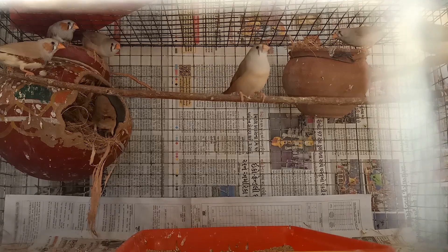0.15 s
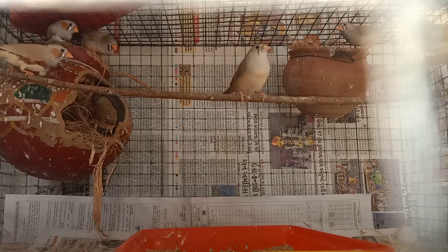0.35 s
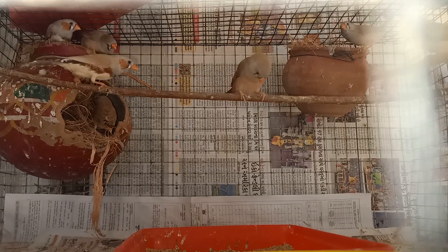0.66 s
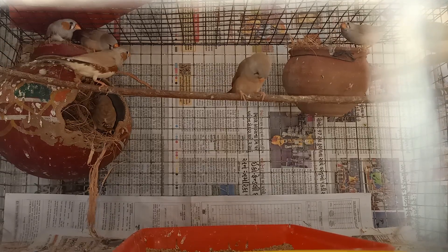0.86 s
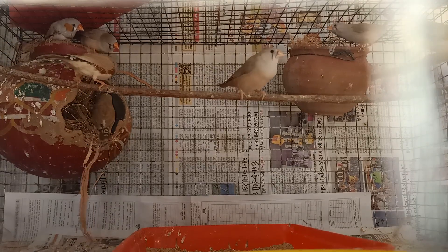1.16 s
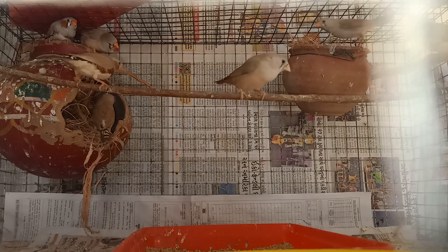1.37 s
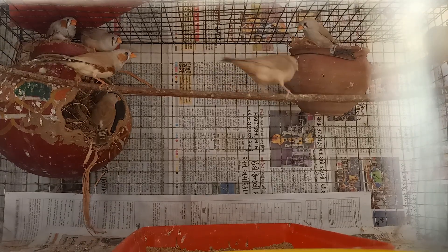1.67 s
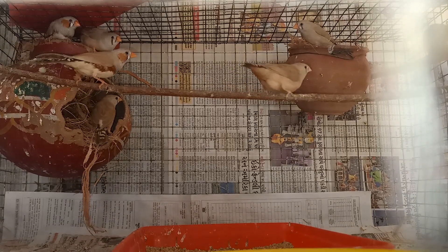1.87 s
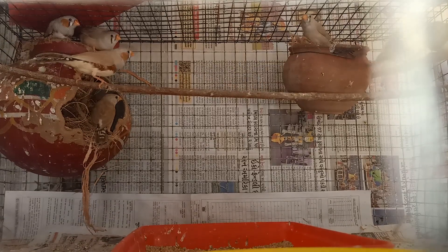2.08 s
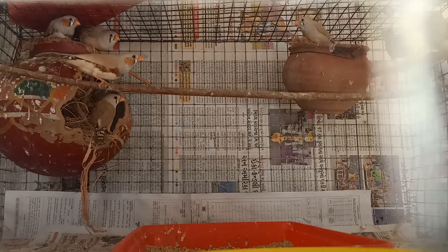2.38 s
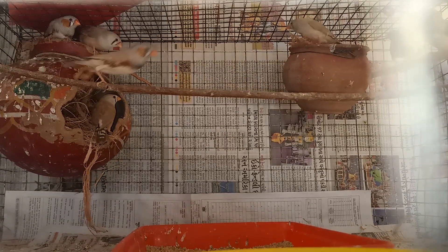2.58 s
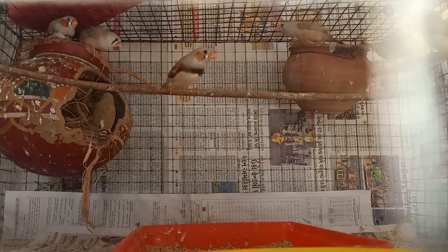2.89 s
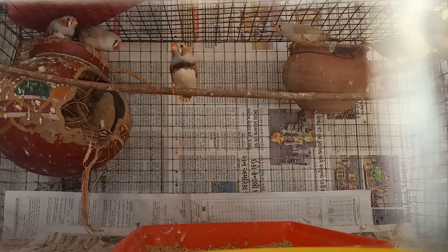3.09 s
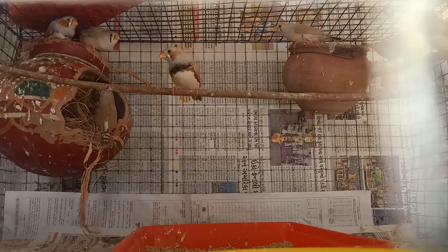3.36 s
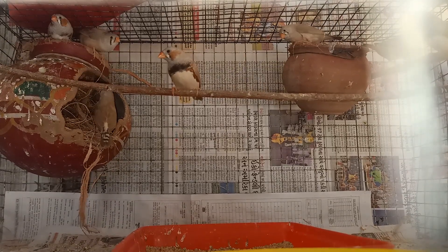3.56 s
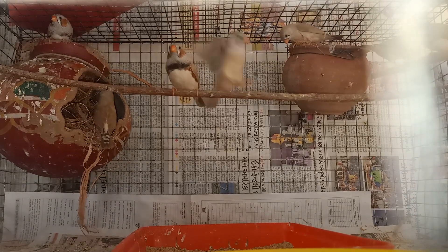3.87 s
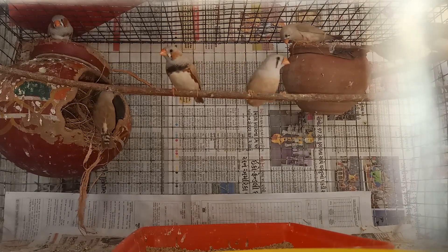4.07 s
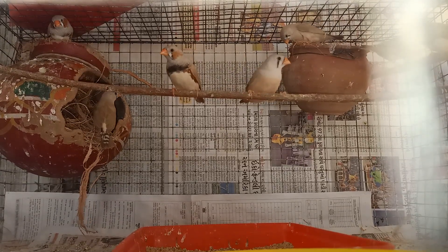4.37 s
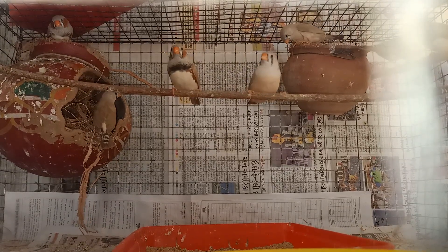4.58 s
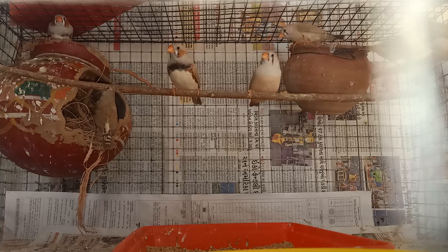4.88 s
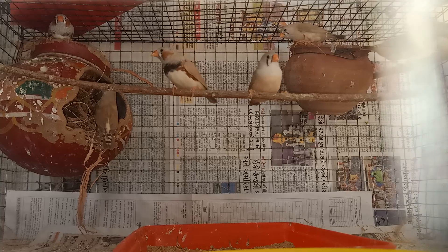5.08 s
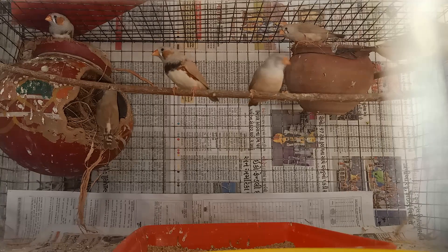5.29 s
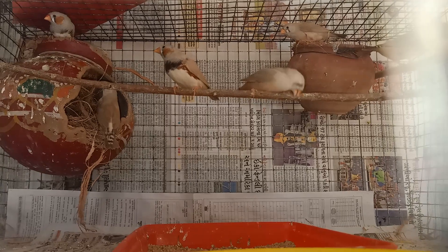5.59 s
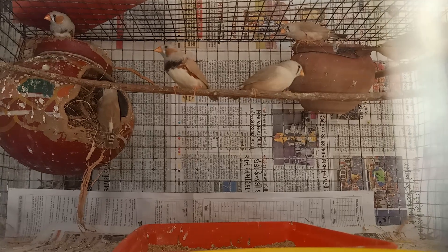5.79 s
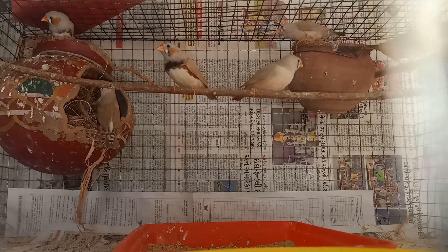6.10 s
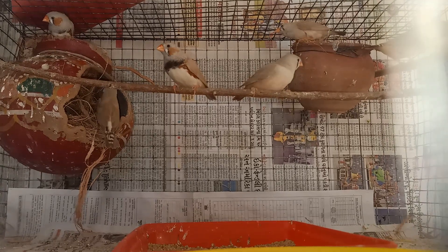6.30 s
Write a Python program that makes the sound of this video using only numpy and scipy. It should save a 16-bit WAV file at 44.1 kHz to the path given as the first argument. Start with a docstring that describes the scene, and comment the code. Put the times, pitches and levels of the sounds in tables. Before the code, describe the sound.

Caged finches indoors, heard in stereo with a long bright room ring. Quick scratchy chirps and nasal calls come first, then harsh rasps and sliding whistles crowd together at the busiest moment. After shorter scattered bursts the flock falls quiet, leaving soft distant twitter, claw ticks and light knocks on the perch. One close bird gives four dry, buzzing notes, and only taps and quiet room tone follow.

```python
"""Small caged finches in a bare, ringing room, heard by two microphones set close together.
From the start slurred whistles, hoarse chirps, buzzy rasps and nasal calls overlap in bursts.
Around 4.5 s the flock falls into a lull with two faint far peeps, and at 5 s one near bird gives four short notes.
Taps on perch and wire, mostly in the second half, claw ticks, far twitter and faint room noise lie beneath.
Calls are gliding oscillators or pulsed noise, taps are decaying noise; reflections and a long ring place them."""
import sys
import numpy as np
from scipy import signal
from scipy.fft import rfft, irfft, next_fast_len
from scipy.io import wavfile
from scipy.ndimage import map_coordinates

SR = 44100
rng = np.random.default_rng(int(sys.argv[2]) if len(sys.argv) > 2 else 0)


def file_out(sig):
    """Save sig as 16-bit WAV at sys.argv[1]."""
    # one column per channel
    cols = np.atleast_2d(sig).T
    # limit, then scale
    lim = np.clip(cols, -1, 1)
    pcm = np.round(lim * 32767).astype(np.int16)
    wavfile.write(sys.argv[1], SR, pcm)


N = 284445


def amp(db):
    """Linear gain of a level in dB."""
    return 10 ** (np.asarray(db) / 20)


def unit(x):
    """x scaled to rms 1."""
    return x / np.sqrt(np.mean(x ** 2) + 1e-20)


def along(points, hz):
    """Read a table of (hz, value) points on a log frequency axis."""
    f, v = np.transpose(points)
    return np.interp(np.log(hz + 1), np.log(f + 1), v)


def filtered(x, response):
    """x shaped by a response of frequency."""
    n = x.shape[-1]
    m = next_fast_len(n + 4096)
    gain = response(np.fft.rfftfreq(m, 1 / SR))
    return irfft(rfft(x, m) * gain, m)[..., :n]


def noise(n, spectrum):
    """Coloured noise of rms 1."""
    white = rng.standard_normal(n)
    return unit(filtered(white, lambda hz: amp(along(spectrum, hz))))


def resonance(hz, centre, width):
    """Gain of a resonance with steep skirts."""
    return 1 / (1 + ((hz - centre) / (width / 2)) ** 4) ** .5


def wobble(n, rate):
    """A smooth random curve with rate knots a second."""
    knots = rng.standard_normal(int(n * rate / SR) + 4)
    return map_coordinates(knots, [np.arange(n) * rate / SR])


def progress(length):
    """0 to 1 over the samples of a note."""
    return np.linspace(0, 1, max(int(length * SR), 64))


def swell(u, rise, fall):
    """Air pressure over a note; rise and fall are shares of its length."""
    opening = np.sin(np.pi / 2 * np.clip(u / rise, 0, 1))
    closing = np.sin(np.pi / 2 * np.clip((1 - u) / fall, 0, 1))
    return opening * closing


def cycles(hz):
    """Phase of an oscillator."""
    return 2 * np.pi * np.cumsum(hz) / SR


def add(out, s, x):
    """Mix a sound in at time s."""
    i = max(int(s * SR), 0)
    out[:, i:i + x.shape[1]] += x[:, :N - i]


# the long ring of the bare room: hz, t60_s
ROOM_RING = [(200, 1.4), (1500, 1.11), (3000, 1.06), (6000, 0.68), (9000, 0.64), (14000, 0.33)]


def in_room(x, early_db, tail_db, pan_db=0, facing_db=0, early_t60=0.17, lag=13):
    """A sound from one spot: direct path, dense reflections of cage and walls, and the room's long ring.
    Positive pan_db favours the left; lag, in samples, is how late the right side hears the direct sound."""
    # each frequency of a noise burst dies at its own rate
    hz, t, burst = signal.stft(rng.standard_normal((2, SR * 4 // 5)), SR, nperseg=256)
    decay = amp(-60 * t / along(ROOM_RING, hz)[:, None])
    tail = signal.istft(burst * decay, SR, nperseg=256)[1]
    t = np.arange(tail.shape[1]) / SR
    tail = tail * (1 - np.exp(-t / 0.019))
    early = rng.standard_normal(tail.shape) * amp(-60 * t / early_t60) * (t > .001)
    path = amp(early_db) * early / np.linalg.norm(early[0])
    # a source turned this way is more direct
    path[[0, 1], [0, int(abs(lag))]] += amp(facing_db)
    # the two microphones sit close together, so neither is ever much louder
    pan_db = np.clip(pan_db, -7, 7)
    path = path * amp([[pan_db / 2], [-pan_db / 2]])
    path = path + amp(tail_db) * tail / np.linalg.norm(tail[0])
    return signal.fftconvolve(x[None], path, axes=1) / np.sqrt(1 + amp(early_db) ** 2)


# spectrum of the room noise: hz, relative_level_db
ROOM_NOISE_SPECTRUM = [(15, -68.5), (25, -28.5), (55, -10), (116, -6.5), (144, -4.5), (297, -5), (399, -7),
                       (469, -7.5), (537, -6.5), (762, -6), (1410, -11.5), (2490, -15), (2700, -11),
                       (3090, -16), (15500, -60)]
# how alike left and right are: hz, likeness (0-1)
LEFT_RIGHT_LIKENESS = [(40, 0.86), (250, 0.92), (600, 0.45), (1500, 0), (10000, 0)]


def room_noise(db=-62):
    """A faint steady rush all around, alike at both microphones in the bass."""
    def mid_side_gain(hz):
        turn = np.arccos(np.clip(along(LEFT_RIGHT_LIKENESS, hz), -1, 1)) / 2
        return amp(along(ROOM_NOISE_SPECTRUM, hz)) * [np.cos(turn), np.sin(turn)]

    mid, side = filtered(rng.standard_normal((2, N)), mid_side_gain)
    return amp(db) * unit(np.array([mid + side, mid - side]))


# spectrum of the far birds: hz, relative_level_db
TWITTER_SPECTRUM = [(1200, -24.5), (2000, 5), (2800, -4), (3700, -3), (5200, 3), (6500, -10.5),
                    (8300, -15.5), (11000, -21.5)]


def twitter(db=-64, swing_db=3, rate=9):
    """Far birds, blurred by the room to a soft restless wash: coloured noise of wandering level."""
    level = amp(db + swing_db * wobble(N, rate))
    return level * np.array([noise(N, TWITTER_SPECTRUM), noise(N, TWITTER_SPECTRUM)])


# spectrum of a tick on the cage wire: hz, relative_level_db
WIRE_SPECTRUM = [(1200, -29.5), (2200, 5.5), (3800, -7.5), (5600, 3.5), (7500, -22), (10000, -30),
                 (15000, -30.5)]


def fidgets(softest_db=-58, range_db=8, t60=0.014, count=45):
    """Tiny claw ticks on the wire at random moments: short decaying noise."""
    ticks, t = np.zeros((1, N)), np.arange(SR // 40) / SR
    for when, size in rng.random((count, 2)):
        decay = amp(softest_db + range_db * size - 60 * t / t60)
        add(ticks, when * N / SR, decay * noise(len(t), WIRE_SPECTRUM)[None])
    return in_room(ticks[0], early_db=-14, tail_db=-14.0, lag=2)[:, :N]


# spectrum of a knock on the perch: hz, relative_level_db
PERCH_SPECTRUM = [(80, -31), (220, -6), (600, -2.5), (1200, -11.5), (2500, -12), (6000, -40)]
# taps on perch and wire: start_s, wood_db, wire_db
TAP_TIMES = [(.359, -48, -85), (2.135, -50, -66), (3.552, -46.5, -55), (4.08, -48, -31), (4.149, -81, -41),
             (4.203, -49, -41), (4.595, -54, -44), (5.305, -51, -38), (5.488, -53.5, -50),
             (5.59, -47.5, -53), (5.696, -58, -48), (5.95, -54.5, -47), (6.01, -51.5, -62.5),
             (6.105, -60, -64)]


def taps(wood_t60=0.12, wire_t60=0.024, rise=0.0016):
    """Feet and beaks knock the perch and tick on the wire; the wood rises softer and dies slower."""
    out, t = np.zeros((2, N)), np.arange(SR // 8) / SR
    for s, wood_db, wire_db in TAP_TIMES:
        knock = amp(wood_db - 60 * t / wood_t60) * noise(len(t), PERCH_SPECTRUM) * (1 - np.exp(-t / rise))
        tick = amp(wire_db - 60 * t / wire_t60) * noise(len(t), WIRE_SPECTRUM)
        add(out, s, in_room(knock + tick, early_db=-4.5, tail_db=-4, lag=3))
    return out


# faint far peeps: start_s, length_s, pitch_hz, level_db
FAR_PEEPS = [(4.476, 0.041, 1125, -57), (4.595, 0.028, 1132, -54.5)]


def peeps():
    """Soft, hoarse low notes from far off, mostly room: a tone with an unsteady pitch."""
    out = np.zeros((2, N))
    for s, length, pitch, db in FAR_PEEPS:
        u = progress(length)
        quaver = 1 + .13 * wobble(len(u), 600)
        note = np.sin(cycles(pitch * quaver)) * swell(u, 0.1, 0.51)
        add(out, s, in_room(amp(db) * note, early_db=-3, tail_db=-1))
    return out


# strength of the nasal harmonics: hz, relative_level_db
NASAL_SPECTRUM = [(1200, -27.5), (2000, -14), (3300, -12.5), (4000, -6), (4600, -21), (5200, -5),
                  (6200, -20.5), (7200, -31), (8300, -26), (10000, -50), (11800, -33), (13000, -55)]
# nasal calls: start_s, length_s, start_pitch_hz, end_pitch_hz, level_db
NASAL_CALLS = [(0, 0.085, 645, 618, -41), (0.57, 0.05, 612, 564.4, -38.5), (3.056, 0.063, 594, 624, -52.5),
               (3.672, .15, 672, 618.6, -42)]


def nasals():
    """Gently gliding calls with a clean stack of harmonics from the second up."""
    out = np.zeros((2, N))
    for s, length, start, end, db in NASAL_CALLS:
        u = progress(length)
        pitch = start + (end - start) * u
        phase = cycles(pitch * (1 + 0.012 * wobble(len(u), 218)))
        call = sum(amp(along(NASAL_SPECTRUM, k * start)) * np.sin(k * phase) for k in range(2, 22))
        call = amp(db) * unit(call) * swell(u, 0.05, 0.16)
        add(out, s, in_room(call, early_db=10.0, tail_db=7.0, pan_db=1.5))
    return out


# throat resonances of the rasps, low to top: centre_hz, width_hz
THROAT_RESONANCES = [(2200, 1010), (3900, 1450), (5700, 1730)]
# spectrum of the rasps' hiss: hz, relative_level_db
HISS_SPECTRUM = [(5000, -23.5), (7500, 7), (9500, -9), (12000, -3.5), (14500, -6), (16000, -31)]
# harsh calls: start_s, length_s, level_db (top resonance), middle_db (middle resonance against the top)
RASP_CALLS = [ (0, 0.036, -39.5, -4), (0.196, .074, -33.5, -6), (0.577, 0.08, -47.5, 6),
              (0.838, 0.075, -45, 7.5), (1.053, 0.089, -29, -5.5), (1.415, 0.043, -46.5, -1),
              (1.627, 0.063, -26, -5.5), (1.849, 0.055, -29, -7), (1.898, 0.1, -30.5, -3.5),
              (1.977, 0.054, -24, -6.5), (2.1, 0.042, -23.5, -10), (2.191, 0.05, -28, -1),
              (2.313, 0.033, -28, -4), (2.368, 0.04, -34.5, 1.5), (2.431, .048, -31, -1),
              (2.701, 0.022, -40, 6.5), (3.195, 0.044, -48.5, 1), (3.3, 0.06, -30.5, 1.5),
              (3.799, 0.064, -51.5, 8), (3.899, 0.094, -54, 6.5), (4.28, 0.015, -43.5, -4),
              (6.357, 0.048, -66, 9)]


def rasps(pulse_hz=180, buzz_db=5, hiss_db=-17, hiss_share=0.32, even_db=-42, dulling=0.83):
    """Harsh calls: air bursts in uneven pulses through three throat resonances; the softer the call, the duller.
    At even_db the low resonance equals the top one; it gains dulling dB for each dB softer."""
    out = np.zeros((2, N))
    for s, length, db, middle_db in RASP_CALLS:
        u = progress(length)
        n = len(u)
        pressure = swell(u, .5, .25)
        dull_db = np.clip(dulling * (even_db - db), -12, 12)
        # hiss grows faster than the voice
        air = amp(hiss_db - hiss_share * dull_db) * noise(n, HISS_SPECTRUM) * pressure
        for (centre, width), level in zip(THROAT_RESONANCES, [dull_db, middle_db, 0]):
            band = filtered(rng.standard_normal(n), lambda hz: resonance(hz, centre, width) ** 2)
            air += amp(level) * unit(band)
        pulse_phase = cycles(pulse_hz * (1 + 0.21 * wobble(n, 75.1)))
        pulses = unit(amp(buzz_db * np.cos(pulse_phase)))
        add(out, s, in_room(amp(db) * air * pulses * pressure, early_db=5.5, tail_db=3.5))
    return out


# rasp of the close notes: hz, relative_level_db
GRIT_SPECTRUM = [(1400, -57), (2200, -26), (3500, 6), (4500, 0), (5500, -2), (6800, -11), (8500, -21),
                 (11000, -29), (15000, -36)]
# close notes: start_s, length_s, start_hz, top_hz, level_db, overtone_db, rise_share (of the length)
CLOSE_NOTES = [(4.988, 0.029, 2294, 3010, -29.5, 0, 1), (5.08, 0.028, 1907, 3130, -30.5, -2.5, 0.46),
               (5.166, 0.033, 2130, 2858, -35, -6, 0.25), (5.275, 0.029, 2030, 2897, -37.5, -17, 0.19)]


def tets(buzz_hz=270, mouth_hz=5400, mouth_width_hz=850):
    """A near bird's short notes: a tone leaps up and levels off near its top, shaken by a fast buzz; its
    overtone rings in the mouth."""
    out = np.zeros((2, N))
    for s, length, start, top, db, overtone_db, rise in CLOSE_NOTES:
        u = progress(length)
        n = len(u)
        buzz = cycles(buzz_hz * (1 + .2 * wobble(n, 300)))
        shake = 1 + .105 * np.sin(buzz) + .055 * wobble(n, 1400)
        pitch = start + (top - start) * np.sin(1.5 * u ** 0.67)
        phase = cycles(pitch * shake)
        overtone = unit(filtered(np.sin(2 * phase), lambda hz: resonance(hz, mouth_hz, mouth_width_hz)))
        pressure = swell(u, rise, 0.087)
        bright = amp(overtone_db) * overtone + amp(-13) * noise(n, GRIT_SPECTRUM)
        # overtone and rasp come in only once the pressure is high
        note = unit(np.sin(phase)) + pressure * bright
        note = note * amp(1.6 * np.cos(buzz) + 1.4 * wobble(n, 500))
        add(out, s, in_room(amp(db) * unit(note) * pressure, early_db=-6, tail_db=-37, early_t60=0.52, lag=1))
    return out


# what the beak lets out: hz, gain_db
BEAK_GAIN = [(1400, -7), (2800, 2), (4000, -5), (5200, 5.5), (6200, -11.5), (7500, -13.5), (9500, -15),
             (12000, -14.5), (15000, -32.5)]


def slur(length, pitches, rough, overtone_db, flutter_hz=450, waver=0.076, flicker_db=11, third_db=-8):
    """A note glides through three pitches; an unsteady syrinx shakes its pitch and strength."""
    u = progress(length)
    n = len(u)
    pitch = np.polyval(np.polyfit([0, .5, 1], pitches, 2), u)
    phase = cycles(pitch * (1 + waver * rough * wobble(n, flutter_hz)))
    levels = [0, overtone_db, overtone_db + third_db]
    tone = sum(amp(level + along(BEAK_GAIN, k * pitch)) * np.sin(k * phase) for k, level in enumerate(levels, 1))
    # turbulence spreads a rough note into noisy sidebands
    tone = tone * (1 + 1.1 * rough * wobble(n, pitches[1] / 2))
    flicker = amp(flicker_db * rough * wobble(n, flutter_hz))
    return unit(tone * flicker) * swell(u, 0.12, 0.087)


def chirp(length, start, end, arch=.012, base_rough=.17, rough_per_s=3.13):
    """A hoarse slide whose pitch bulges slightly by the share arch; longer chirps are hoarser."""
    rough = base_rough + rough_per_s * length
    middle = (start + end) / 2 * (1 + arch)
    return slur(length, [start, middle, end], rough, overtone_db=-21)


# how busy the flock is: time_s, level_db
FLOCK_LEVEL = [(0.0, -30.5), (0.56, -38), (1.74, -30), (2.17, -27), (3.1, -54.5), (3.96, -31.5),
               (4.35, -55.5), (4.5, -59)]


def chatter(under_db=-4, spread_db=2, pitch_hz=3300, pitch_spread=.27, slide=0.1186, length_s=0.024, count=13):
    """Three birds slip in softer chirps at random, as loud as the flock is busy, until the lull."""
    out = np.zeros((2, N))
    for pan in (-5, -2, 1):
        bird = np.zeros((1, N))
        times = (np.arange(count) + rng.random(count)) / count * FLOCK_LEVEL[-1][0]
        traits = rng.standard_normal((count, 4)).clip(-2, 2)
        for s, (size, high, glide, long) in zip(times, traits):
            db = np.interp(s, *np.transpose(FLOCK_LEVEL)) + under_db + spread_db * size
            hz = pitch_hz * np.exp(pitch_spread * high)
            length = length_s * np.exp(0.39 * long)
            note = chirp(length, hz * (1 + slide * glide), hz * (1 - slide * glide))
            add(bird, s, amp(db) * note[None])
        add(out, 0, in_room(bird[0], early_db=8.5, tail_db=2.5, pan_db=pan, facing_db=2))
    return out


# arched whistles: start_s, length_s, start_hz, middle_hz, end_hz, level_db, roughness (0-1),
# overtone_db, left_over_right_db (the room holds it within 7 either way)
WHISTLE_NOTES = [ (1.61, 0.11, 1444, 1688, 1606, -39.5, 0.27, -9, -6),
                 (1.921, 0.046, 1426, 1814, 1840, -33.5, 0.01, -20, 5),
                 (1.967, 0.09, 1810, 2024, 2043, -24.5, 0.15, -24, -8.5),
                 (2.084, 0.027, 6390, 5960, 5830, -29, 0.16, -9.5, 9),
                 (2.107, .043, 3866, 3822, 3604, -25.5, 0.23, -26, -3.5),
                 (2.17, 0.042, 3687, 3947, 4360, -29, 0.27, -24, -5.5),
                 (2.684, .078, 1539, 1714, 1974, -35.5, 0.22, -9.5, -4),
                 (2.75, 0.063, 2063, 2000, 1730, -37.5, 0.25, -23, 4.5),
                 (2.812, 0.055, 1675, 2025, 2537, -31, 0.2, -18, -7),
                 (2.857, 0.027, 2816, 2966, 2520, -25.5, 0, -24, -13),
                 (3.121, .078, 1562, 2314, 2125, -37, 0.12, -23, -3.5),
                 (3.191, 0.092, 1932, 1793, 1770, -35.5, 0.29, -10.5, -4.5)]


def whistles():
    """Slurred notes, mostly low, from birds that face the microphones, so the direct sound is strong."""
    out = np.zeros((2, N))
    for s, length, start, middle, end, db, rough, overtone_db, pan in WHISTLE_NOTES:
        note = amp(db) * slur(length, [start, middle, end], rough, overtone_db)
        add(out, s, in_room(note, early_db=3.5, tail_db=-2.5, pan_db=pan, facing_db=7))
    return out


# short hoarse chirps: start_s, length_s, start_hz, end_hz, level_db
CHIRP_NOTES = [ (0, 0.0096, 3130, 3120, -27.5), (.029, 0.0427, 4130, 3940, -34.5),
               (0.118, 0.04, 3520, 3290, -36.5), (0.138, .032, 5600, 6940, -39.5),
               (0.141, 0.058, 3000, 2190, -35.5), (0.165, .014, 5800, 4550, -30),
               (0.279, .036, 2806, 1980, -30), (.284, .01, 4530, 3640, -34), (0.309, .028, 3050, 3230, -37),
               (0.328, 0.032, 3030, 2134, -32), (0.363, 0.036, 2725, 1957, -30),
               (0.392, 0.023, 3660, 3940, -34.5), (0.406, 0.036, 2687, 3033, -30.5),
               (.454, .025, 2930, 2740, -32.5), (.62, .042, 3430, 3305, -42),
               (0.654, 0.0267, 2654, 2754, -31), (.776, 0.015, 5370, 4750, -40),
               (0.824, .012, 3890, 4616, -28.5), (0.843, 0.0279, 3355, 4010, -28),
               (0.856, 0.043, 3400, 2652, -30.5), (0.914, 0.019, 2812, 2743, -29.5),
               (0.925, 0.011, 3790, 3770, -29), (.961, .047, 4280, 4260, -41.5),
               (0.999, 0.063, 3334, 3135, -38.5), (1.227, 0.015, 2850, 3650, -32),
               (1.25, 0.034, 3450, 2217, -31), (1.291, .019, 2780, 2966, -28.5),
               (1.326, 0.022, 2600, 2600, -37.5), (1.408, .03, 4720, 3390, -39.5),
               (1.433, .014, 2390, 1940, -36), (1.483, .016, 2550, 1920, -32.5),
               (1.491, 0.063, 3000, 3400, -39), (1.57, 0.011, 2085, 2380, -30.5),
               (1.589, 0.026, 4160, 3770, -39.5), (1.737, 0.033, 2650, 2720, -31.5),
               (2.382, .025, 5200, 5040, -29.5), (2.417, 0.0433, 3195, 3474, -31.5),
               (2.466, 0.038, 2466, 2380, -33.5), (2.639, 0.051, 2370, 2770, -29),
               (2.659, 0.068, 3207, 3380, -32), (3.511, 0.017, 2786, 2300, -29.5),
               (3.537, .027, 2630, 2864, -33), (3.707, .07, 2250, 2727, -32),
               (3.747, 0.032, 3930, 3860, -34), (3.801, 0.0272, 2770, 3305, -31.5),
               (3.946, 0.036, 2424, 2520, -37), (4.038, .083, 2400, 2028, -39)]


def chirps():
    """Short hoarse slides, stronger on the right, heard mostly by way of cage and walls."""
    out = np.zeros((2, N))
    for s, length, start, end, db in CHIRP_NOTES:
        note = amp(db) * chirp(length, start, end)
        add(out, s, in_room(note, early_db=2, tail_db=-3.0, pan_db=-4.5, facing_db=-2.5))
    return out


def scene():
    """The room and the far birds, the cage sounds, then the calling flock."""
    background = room_noise() + twitter() + fidgets() + taps() + peeps()
    return background + nasals() + rasps() + tets() + chatter() + whistles() + chirps()


def record(dry, top_hz=15600):
    """The recorder keeps nothing above its band limit."""
    return filtered(dry, lambda hz: hz < top_hz)


dry = scene()
out = record(dry)
file_out(out)
```